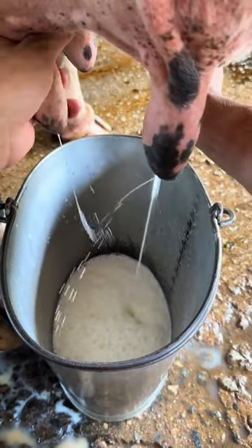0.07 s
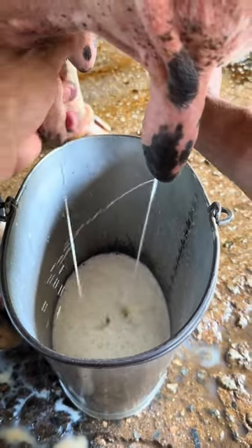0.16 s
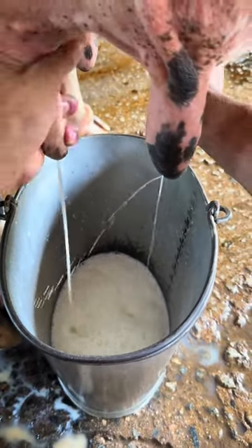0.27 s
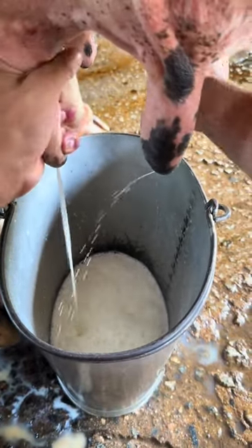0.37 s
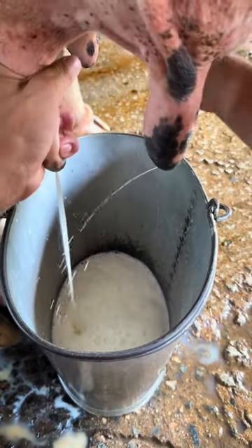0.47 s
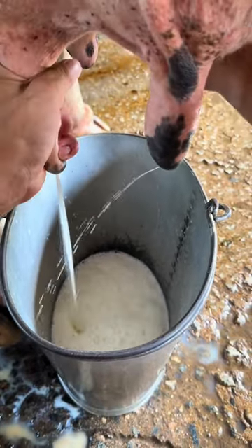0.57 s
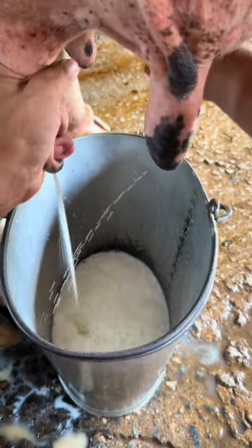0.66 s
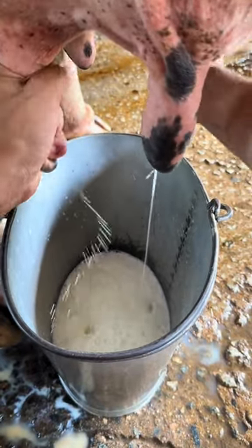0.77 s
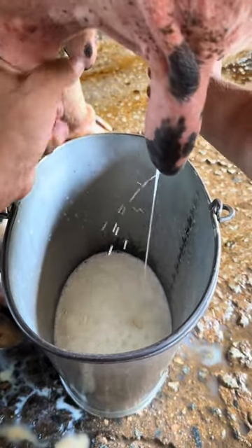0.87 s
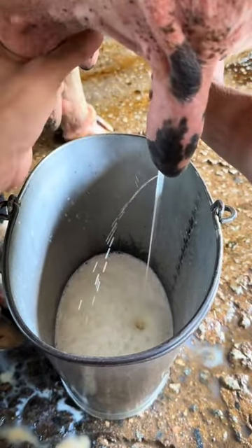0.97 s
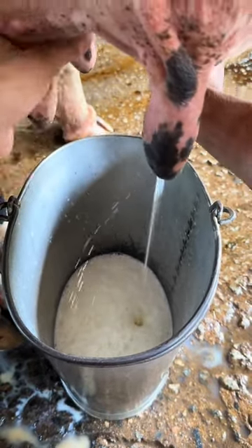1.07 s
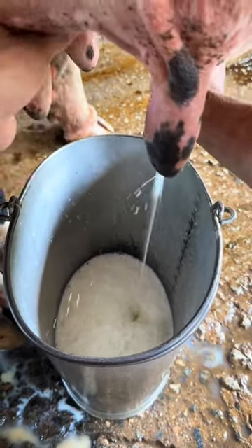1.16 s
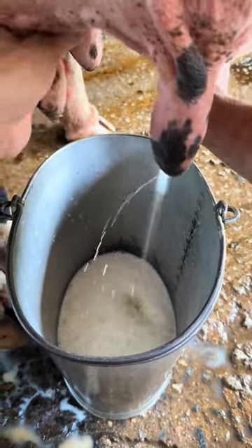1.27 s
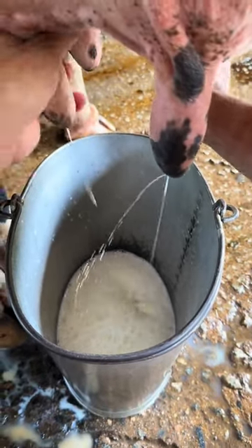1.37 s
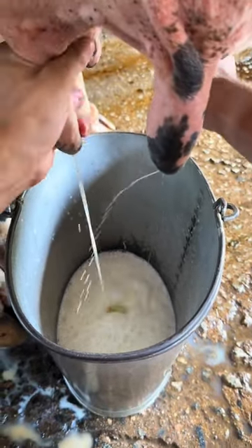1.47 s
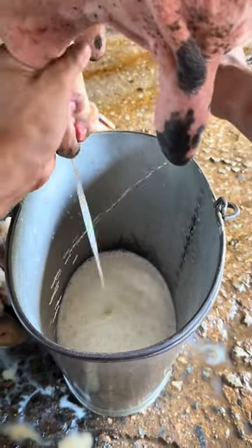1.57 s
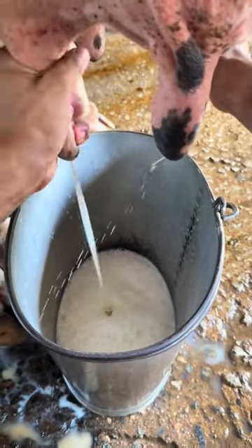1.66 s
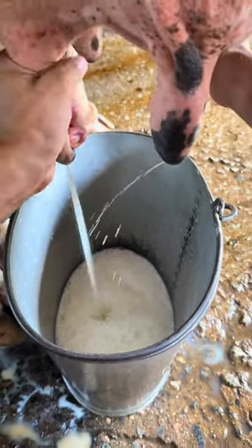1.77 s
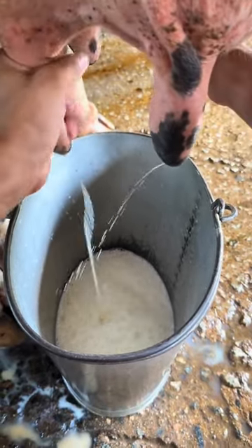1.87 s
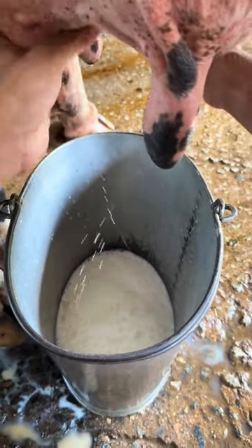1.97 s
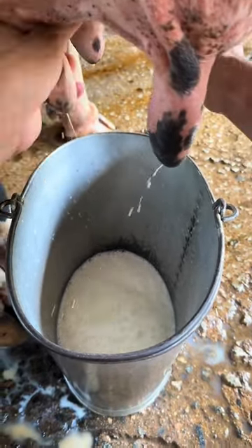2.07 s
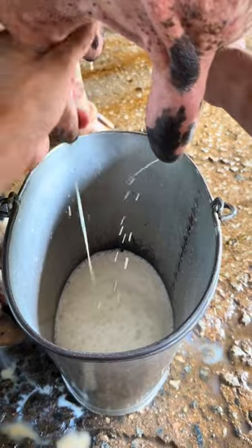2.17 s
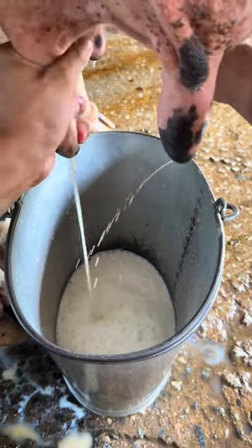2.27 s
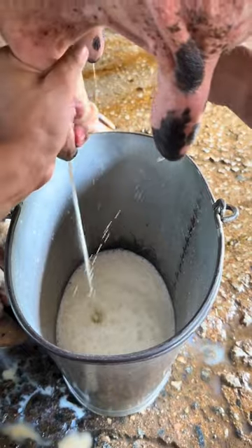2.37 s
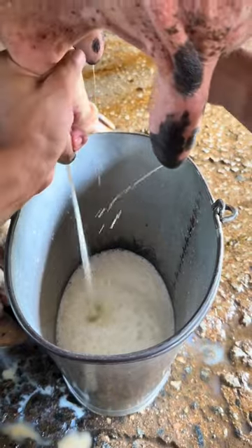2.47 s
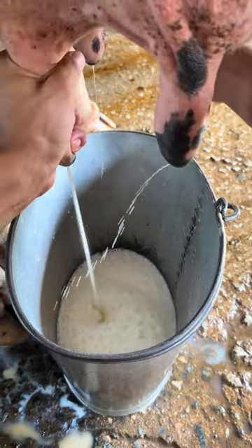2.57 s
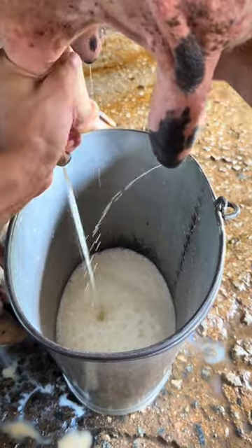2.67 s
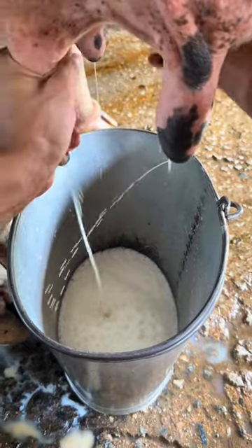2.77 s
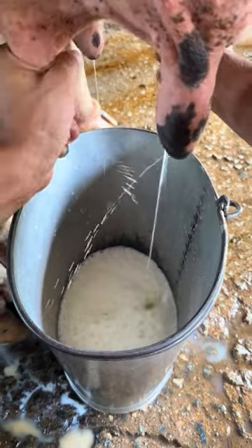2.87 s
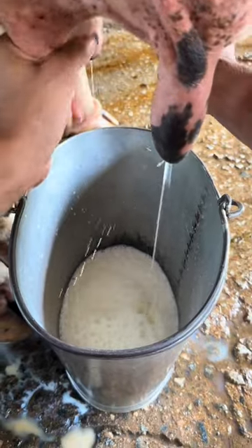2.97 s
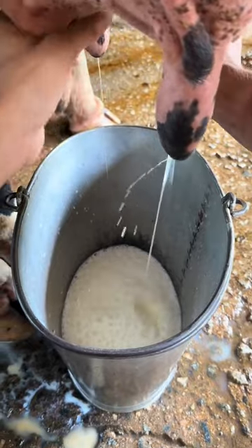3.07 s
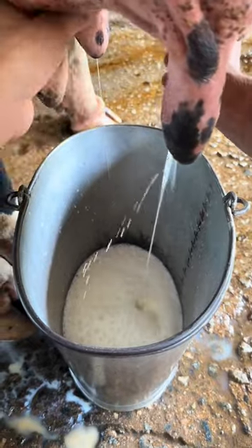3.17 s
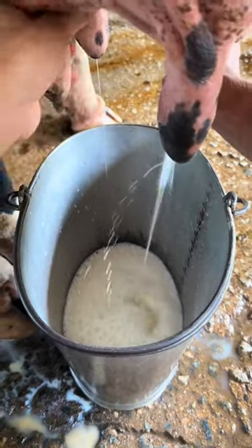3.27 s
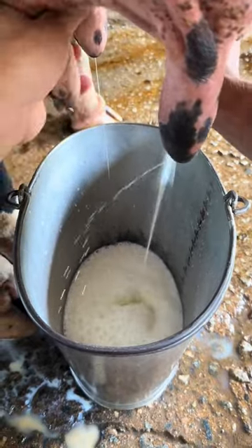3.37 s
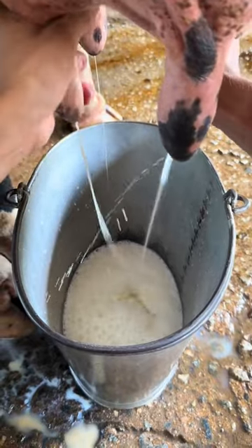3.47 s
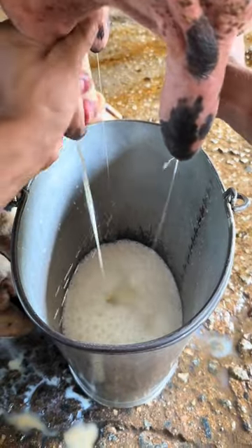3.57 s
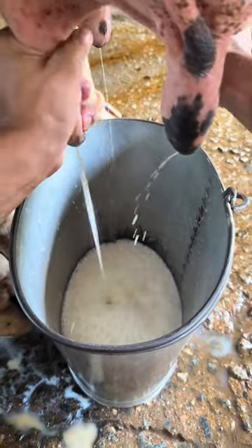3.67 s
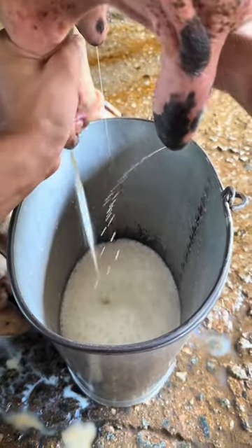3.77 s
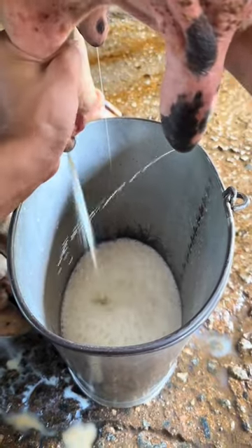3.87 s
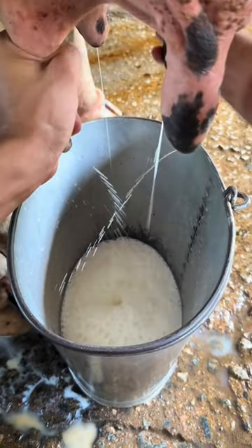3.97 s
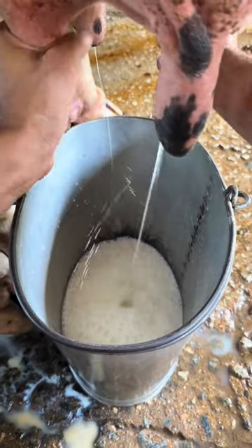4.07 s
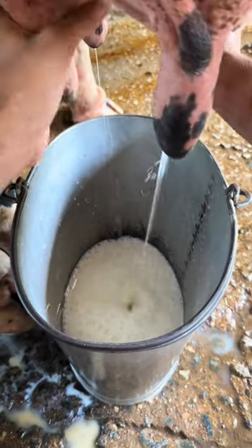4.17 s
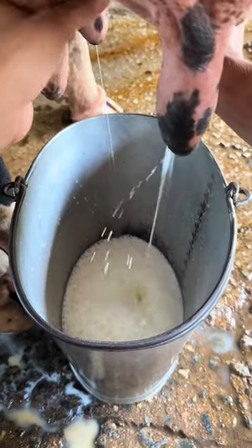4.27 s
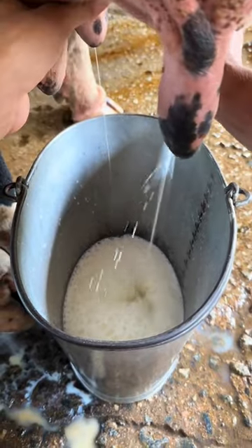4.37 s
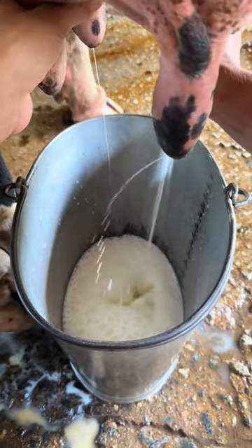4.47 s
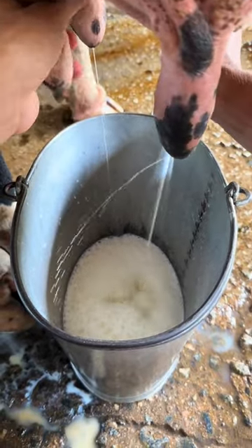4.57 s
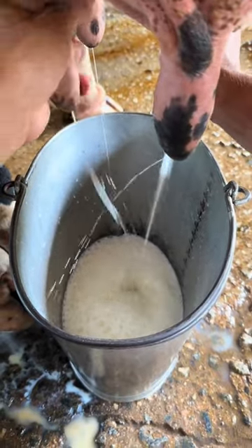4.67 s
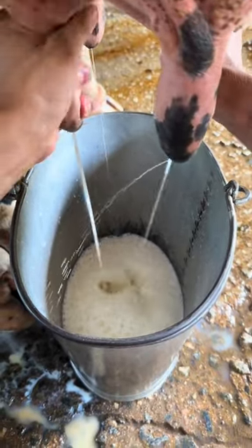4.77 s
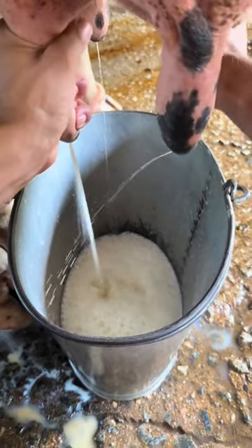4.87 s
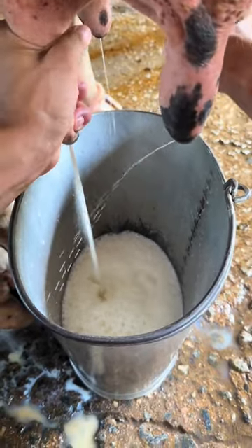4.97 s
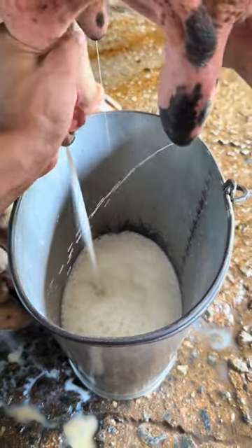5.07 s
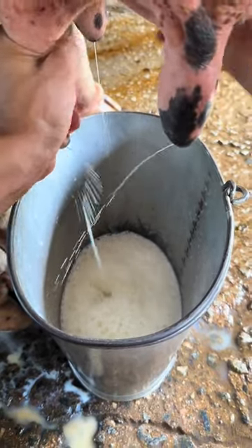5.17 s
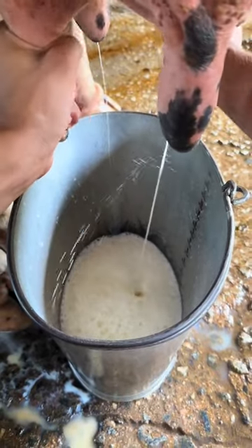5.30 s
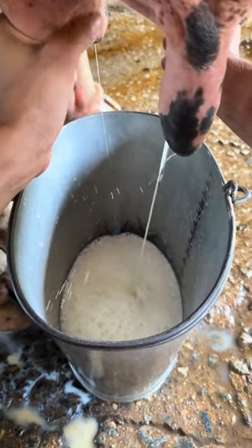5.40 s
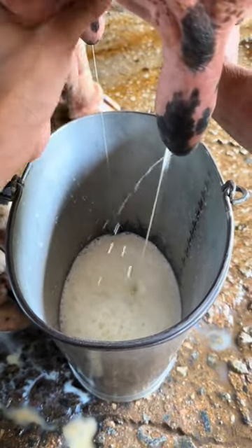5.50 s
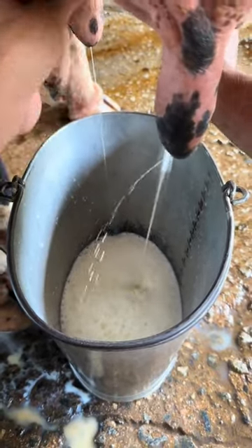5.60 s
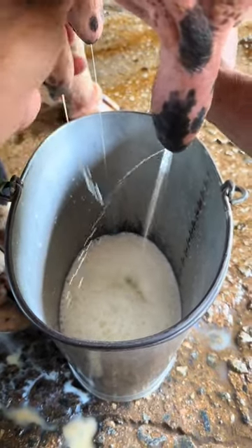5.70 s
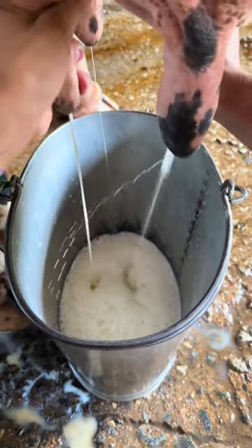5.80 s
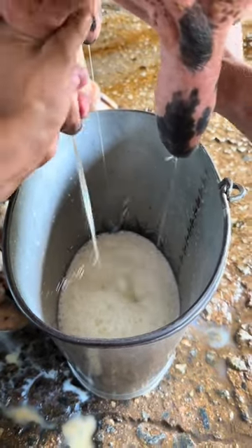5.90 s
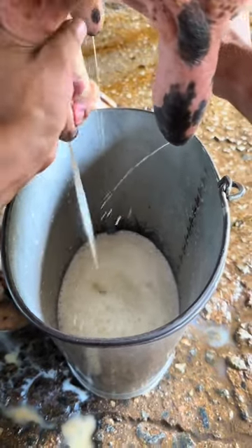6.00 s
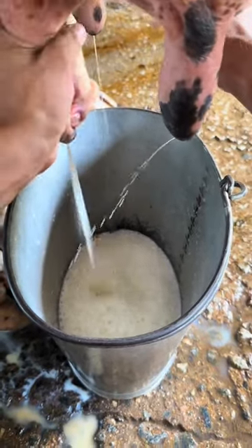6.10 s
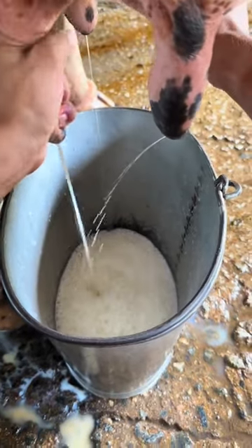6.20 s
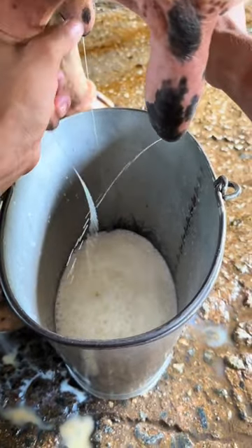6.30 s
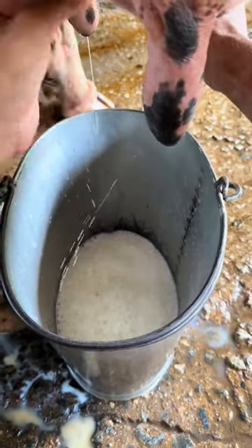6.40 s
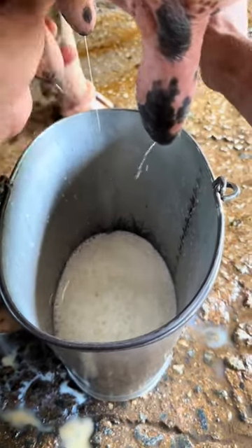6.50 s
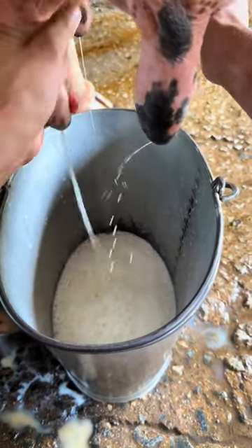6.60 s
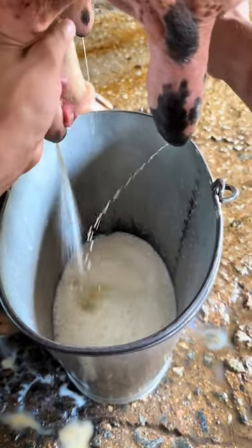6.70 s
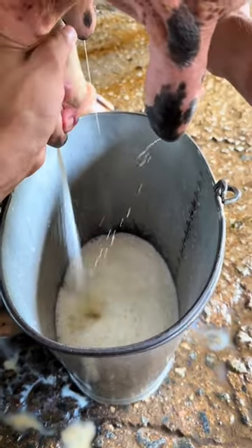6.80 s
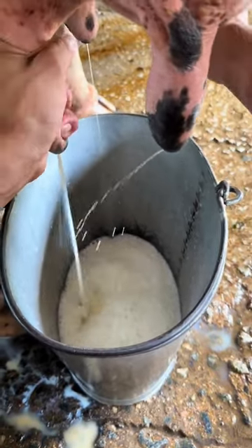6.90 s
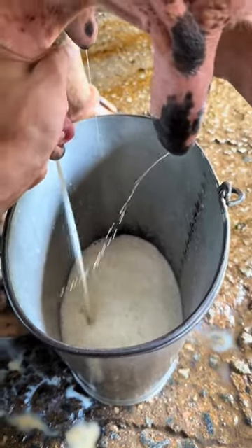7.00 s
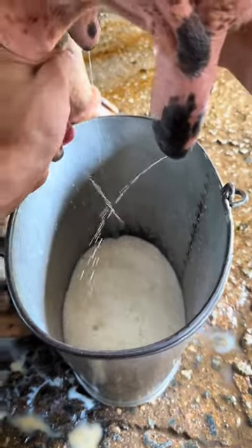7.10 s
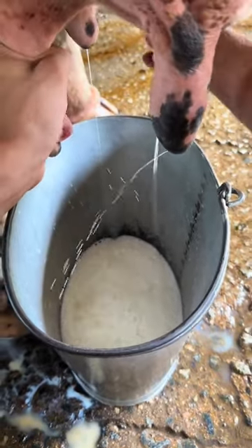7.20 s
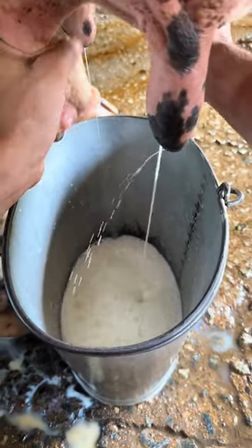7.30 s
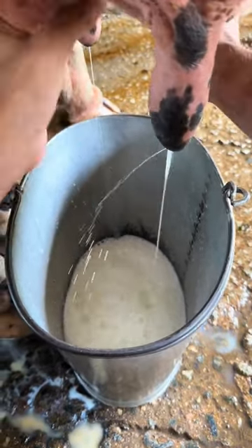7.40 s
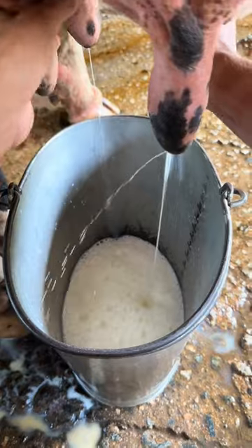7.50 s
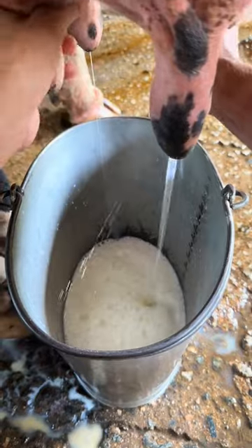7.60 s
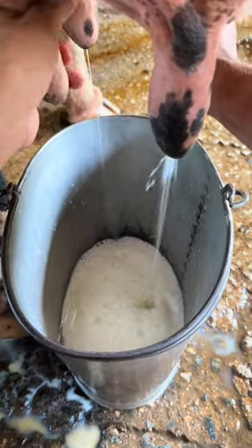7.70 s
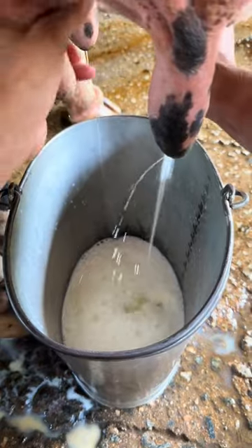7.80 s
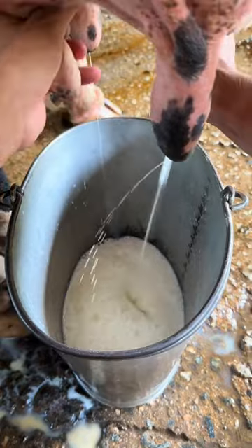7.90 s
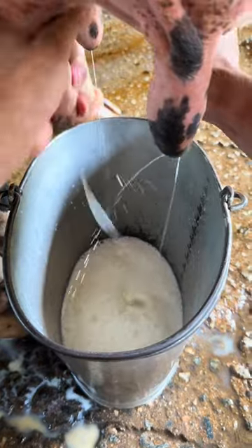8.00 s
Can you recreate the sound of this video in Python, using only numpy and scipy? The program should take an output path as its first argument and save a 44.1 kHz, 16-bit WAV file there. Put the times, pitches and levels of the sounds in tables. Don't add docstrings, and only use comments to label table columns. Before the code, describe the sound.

Rhythmic hand milking into thick froth inside a metal bucket. Crisp hissing spray, dense droplet patter, low thumps around the pail's hollow resonance and rounded bubble plops alternate between two slightly different landing spots. Isolated bright drips and splashes mark the starts and ends. The bursts run almost continuously for eight seconds, with a few brief dips. The close stereo phone sound sways slightly, with thin, patchy, faintly whistling treble and a soft distant shed hum.

```python
import sys
import numpy as np
from scipy import signal
from scipy.fft import rfft, irfft
from scipy.io import wavfile
from scipy.ndimage import uniform_filter1d

SR = 44100
rng = np.random.default_rng(int(sys.argv[2]) if len(sys.argv) > 2 else 0)


def persist_wave(psi):
    counts = np.round(np.clip(psi, -1, 1) * 32767).astype(np.int16)
    wavfile.write(sys.argv[1], SR, np.atleast_2d(counts).T)


def nominal_scale(level):
    x = np.asarray(level, float) / 20
    return 10 ** x


N = 355005
TIME = np.arange(N) / SR
COARSE = np.arange(N // 40 + 2) * 40 / SR

# jet lands in seconds, breaks off in seconds, first force in dB,
# last force in dB, plunge into the froth in dB
LEFT_SQUIRTS = [
    (0.208, 0.741, -43, -41.5, -1),
    (1.469, 1.813, -41, -38.5, 2),
    (2.2, 2.759, -39.5, -42, 2),
    (3.48, 3.95, -40.5, -40, 1.5),
    (4.72, 5.165, -42, -39.5, -1),
    (5.83, 6.211, -40, -41, 2.5),
    (6.632, 7.042, -42.5, -40, -3.5),
    (8.016, 8.2, -44.5, -47, -16),
]
RIGHT_SQUIRTS = [
    (-0.2, 0.194, -36, -42, 0.5),
    (0.84, 1.34, -39, -41.5, -2.5),
    (2.859, 3.484, -40.5, -38.5, -1),
    (4.042, 4.72, -40.5, -39.5, -3),
    (5.284, 5.792, -43, -39.5, 0.7),
    (7.277, 7.895, -44, -39.5, 2.5),
]
BAND_EDGES_HZ = [9475, 10164, 10853, 11542, 13060, 14470, 15850]


def rms_one(x):
    return x / np.sqrt(np.mean(x ** 2) + 1e-20)


def side_gain(db):
    return nominal_scale(np.array([[0], [db]]))


def at_hz(points, hz):
    return np.interp(np.log(hz), np.log(np.array(points)[:, 0]), np.array(points)[:, 1])


def gate(start, end, rise, fall, time=TIME):
    return np.interp(time, [start - rise, start, end, end + fall], [0, 1, 1, 0])


def fine(x):
    return np.interp(TIME, COARSE, x)


def drift(rate):
    r = np.exp(-80 * np.pi * rate / SR)
    chance = rng.standard_normal(len(COARSE) + 2000)
    return rms_one(signal.lfilter([1], [1, -2 * r, r * r], chance)[2000:])


def resonance(x, hz, width_hz):
    r = np.exp(-np.pi * width_hz / SR)
    poles = [1, -2 * r * np.cos(2 * np.pi * hz / SR), r * r]
    return signal.lfilter((1 - r * r) / 2 * np.array([1, 0, -1]), poles, x)


def lifted(x, modes):
    for hz, width_hz, lift_db in modes:
        x = x + (nominal_scale(lift_db) - 1) * resonance(x, hz, np.maximum(width_hz, 20))
    return x


def grains(per_s, spread_db, rows=2):
    draw = rng.random((3, rows, N))
    hit = draw[0] < per_s / SR
    out = np.zeros((rows, N))
    size = nominal_scale(spread_db * np.minimum(-np.log(draw[1][hit] + 1e-9), 5))
    out[hit] = size * np.sign(draw[2][hit] - .5)
    return rms_one(out)


def banded(source, low_hz, high_hz, spectrum, patchy_db):
    # frequency in Hz, side minus mid in dB
    side_width = [(150, -28), (250, -37.5), (380, -17), (600, -3), (900, -2), (1300, -5), (1900, -14.5),
                  (2600, -4.5), (3800, -3), (6000, -3.5), (9000, -5.5)]
    edges = np.geomspace(low_hz, high_hz, 1 + int(np.ceil(3 * np.log2(high_hz / low_hz))))
    out = 0
    for k, (low, high) in enumerate(zip(edges, edges[1:])):
        hz = np.sqrt(low * high)
        band = signal.sosfilt(signal.butter(2, [low, high], "band", fs=SR, output="sos"), source)
        patches = patchy_db * (drift(4.0) + 0.59 * drift(21))
        gain = (-1) ** k * fine(nominal_scale(at_hz(spectrum, hz) + patches))
        out = out + gain * band * side_gain(at_hz(side_width, hz))
    return out


def jets(drum_room, gurgle_room):
    # frequency in Hz, level in dB per Hz
    jet_colour = [(76, -56), (130, -25), (211, -0.5), (291, 1.5), (367, -7.5), (507, -12), (752, -9.5),
                  (884, -16), (984, -15.5), (2990, -21.5), (9400, -28.5), (12200, -68), (20700, -120)]
    # level against force in dB, share of plunge, share of grip time, lasts on in seconds,
    # fall in dB per second
    impacts = [
        (5.5, 0.86, 0.61, 0.066, 366),
        (3, 0.42, 1.11, 0.019, 201),
        (-2.5, -0.16, 1.02, 0.0014, 180),
        (-0.25, -0.28, 1.19, 0.00079, 163),
    ]

    def milk(per_s, spread_db, low_hz, high_hz, patchy_db):
        return in_pail(banded(grains(per_s, spread_db), low_hz, high_hz, jet_colour, patchy_db))

    slugs = bursts(per_s=200, fade_s=0.038)
    drum_gain = drum_room * impact(*impacts[0], late_share=0.046) * nominal_scale(0.1 * slugs)
    drum = drum_gain * milk(1500, 1.6, 119.0, 409.5, patchy_db=0.9)
    gurgle_gain = gurgle_room * impact(*impacts[1]) * nominal_scale(0.11 * slugs)
    gurgle = gurgle_gain * milk(3000, 1.87, 372.6, 1278, patchy_db=0.16)
    splash = impact(*impacts[2]) * nominal_scale(0.25 * slugs) * milk(4000, 1.0, 1076, 2200, patchy_db=0.1)
    spray_gain = impact(*impacts[3]) * nominal_scale(1.63 * slugs)
    spray = spray_gain * milk(9000, 2.0, 1944, 10230, patchy_db=1.45)
    return drum + gurgle + landing(splash + spray), spray_gain


def bursts(per_s, fade_s):
    hits = np.abs(grains(per_s, 0.97, rows=1)[0])
    slugs = signal.lfilter([1], [1, -np.exp(-1 / (fade_s * SR))], hits)
    return rms_one(slugs - slugs.mean())


def impact(rise_db, plunge_share, grip_share, lasts_s, fall, late_share=0):
    ease_s = 0.14
    crisp_per_plunge = 1.2
    dribble_db, dribble_per_plunge, dribble_db_per_s = -9.5, 1.8, 131
    hands = ((0.093, -8.5, LEFT_SQUIRTS), (0.15, -10, RIGHT_SQUIRTS))
    power = 1e-12
    for grip_s, thread_db, squirts in hands:
        for start, end, first_db, last_db, plunge_db in squirts:
            start = start + late_share * grip_s
            full = start + abs(grip_s * grip_share)
            stop = end + lasts_s
            held = np.interp(COARSE, [start - .03, start, full, stop - ease_s, stop],
                             [first_db - 43.5, first_db + thread_db, first_db, last_db, last_db])
            after = np.maximum(COARSE - stop, 0)
            break_off = -fall * nominal_scale(-crisp_per_plunge * min(plunge_db, 0)) * after
            dribble = dribble_db + dribble_per_plunge * plunge_db - dribble_db_per_s * after
            tail = np.maximum(break_off, dribble)
            power = power + nominal_scale(2 * (held + tail + plunge_share * plunge_db))
    return nominal_scale(rise_db) * fine(np.sqrt(power))


def in_pail(x):
    # frequency in Hz, width in Hz, lift in dB
    air_modes = [(217, 14, 4), (249, 112, 5), (302.6, 9.8, 6.5), (510, 17, 8), (657, 25, 3.5),
                 (879, 52, 8.5), (1299, 13, -23)]
    x = lifted(x, air_modes)
    return x / np.sqrt(np.mean(x[0] ** 2))


def landing(x):
    # frequency in Hz, width in Hz, lift in dB
    left_spot = [(1737, 49, 6.5), (3370, 230, 3), (4770, 170, -6), (5550, 1500, 2.5), (7480, 640, 2)]
    right_spot = [(2000, 150, -5), (2400, 130, 3.5), (3630, 510, 2), (6270, 410, 4.5), (6570, 280, -4.5)]
    # peak in Hz, its lift in dB, notch in Hz, its gain in dB
    left_echoes = [(3010, 5.5, 3440, -25), (5930, 4, 5600, -9), (3020, 0.5, 6500, -3), (9100, 8, 1800, 1.5),
                   (3500, 1, 9000, 2), (6200, 2.5, 4100, -3), (2870, -3, 2110, -7.5), (4000, 4, 6500, 15)]
    right_echoes = [(9160, 10.4, 9360, -24), (5570, 1.4, 3300, -4), (5970, 3, 4100, 1),
                    (5770, 1.1, 3100, 0), (3130, 1.6, 3340, -11), (5370, 3.7, 4930, 3.5)]
    out = x.copy()
    hands = ((left_spot, LEFT_SQUIRTS, left_echoes), (right_spot, RIGHT_SQUIRTS, right_echoes))
    for spot, squirts, echoes in hands:
        for (start, end, *_), (peak_hz, lift_db, notch_hz, cut_db) in zip(squirts, echoes):
            part = slice(max(round((start - .05) * SR), 0), round((end + .12) * SR))
            plain = x[:, part]
            own = [(peak_hz, 330, lift_db), (notch_hz, 330, cut_db),
                   (peak_hz - 720, 400, -.8 * max(lift_db + 0.5, 0))]
            coloured = lifted(plain, list(spot) + own)
            change = coloured * plain.std() / coloured.std() - plain
            out[:, part] += gate(start + 0.029, end + 0.062, 0.03, 0.039)[part] * change
    return out


def craters():
    # start in seconds, end in seconds, pitch in Hz, width in Hz, level in dB
    hollows = [(.25, .31, 2950, 400, -46), (.325, .365, 2980, 250, -39.5), (.38, .775, 2950, 330, -45),
               (.836, .857, 1620, 350, -35), (.838, .858, 2450, 400, -40), (1.385, 1.47, 3500, 5000, -53),
               (1.505, 1.55, 1150, 500, -30.5), (1.495, 1.545, 2450, 500, -39.5),
               (2.82, 2.875, 3000, 5000, -51), (2.88, 2.945, 2000, 1500, -42), (3.04, 3.2, 5800, 1200, -46),
               (2.13, 2.142, 2650, 400, -62), (.862, .872, 7500, 3000, -50),
               (2.167, 2.173, 4500, 5000, -53), (2.188, 2.198, 5500, 2000, -53),
               (2.229, 2.265, 1250, 450, -37), (4.076, 4.09, 1400, 450, -36), (4.138, 4.25, 4400, 300, -49),
               (4.778, 4.803, 1500, 1300, -37.5), (4.808, 4.85, 560, 350, -35),
               (4.84, 4.87, 1300, 600, -41), (5.3, 5.355, 5800, 2500, -49), (5.335, 5.345, 1500, 400, -36),
               (5.335, 5.35, 3600, 2500, -44), (5.395, 5.44, 6000, 350, -51),
               (6.444, 6.448, 1500, 1200, -53), (6.528, 6.538, 1000, 600, -47),
               (6.8, 7.075, 2900, 320, -42), (7.212, 7.226, 1100, 700, -49), (7.238, 7.32, 5200, 3500, -53),
               (7.235, 7.29, 1300, 1600, -50), (7.3, 7.36, 650, 600, -41), (7.43, 7.7, 1400, 600, -42.5)]
    patter = grains(2500, 2.7)
    out = np.zeros((2, N))
    for start, end, hz, width_hz, level_db in hollows:
        part = slice(round((start - .05) * SR), round((end + .25) * SR))
        once = resonance(patter[:, part], hz, 1.15 * width_hz)
        ring = rms_one(resonance(once, hz, 1.15 * width_hz))
        swell = gate(start, end, .002 + .12 * min(end - start, .1), .012)[part]
        out[:, part] += nominal_scale(level_db - 1) * swell * ring * side_gain(-12)
    return out


def cave_ins():
    lasts_s, after_s = .036, .046
    out = np.zeros((2, N + SR))
    age = np.arange(round(lasts_s * SR)) / SR
    shape = np.sin(np.pi * (age / lasts_s) ** .8)
    for _, end, _, last_db, plunge_db in LEFT_SQUIRTS:
        at = round((end + after_s) * SR)
        hz = 280 * rng.uniform(.92, 1.08)
        out[0, at:at + len(age)] += nominal_scale(last_db + plunge_db + 8) * shape * np.sin(2 * np.pi * hz * age)
    return out[:, :N]


def knocks(rows, swell_s, level_db):
    swallowed = 0.26
    out, busy = np.zeros((2, N + SR)), np.zeros(N + SR)
    age = np.arange(SR // 10) / SR
    shape = age / swell_s * np.exp(1 - age / swell_s)
    for s, peak_db, hz in rows:
        part = slice(round(s * SR), round(s * SR) + len(age))
        out[0, part] += nominal_scale(peak_db + level_db) * shape * np.sin(2 * np.pi * hz * age)
        busy[part] = np.maximum(busy[part], shape)
    return out[:, :N], 1 - swallowed * busy[:N]


def thumps():
    # start in seconds, peak in dB, pitch in Hz
    slug_hits = [(0.085, -20, 270), (0.363, -24, 267), (0.414, -25.5, 250), (0.67, -26, 280),
                 (0.701, -31, 275), (0.926, -24, 307), (1.099, -23, 310), (1.147, -26, 293),
                 (1.187, -19, 260), (1.35, -29.5, 250), (1.486, -22.5, 272), (1.556, -20.5, 296),
                 (1.669, -20, 289), (1.704, -18.5, 306), (1.788, -22, 280), (1.881, -26, 290),
                 (2.209, -25.5, 262), (2.25, -26, 262), (2.325, -21.5, 278), (2.79, -19.5, 291),
                 (2.564, -22, 276), (2.628, -22.5, 282), (2.727, -20, 257), (2.954, -23, 298),
                 (3.049, -24, 308), (3.103, -29, 260), (3.347, -28, 276), (3.383, -31, 253),
                 (3.466, -20.5, 234), (3.511, -30, 269), (3.59, -21.5, 249), (3.637, -20.5, 278),
                 (3.709, -22, 283), (3.758, -17.5, 290), (3.845, -19, 247), (4.084, -27.5, 313),
                 (4.156, -21.5, 243), (4.185, -25.5, 264), (4.229, -18, 266), (4.393, -23.5, 300),
                 (4.569, -26, 267), (5.088, -25, 241), (5.129, -29, 277), (5.152, -22.5, 280),
                 (5.214, -17.5, 290), (5.525, -22, 230), (5.672, -24, 245), (5.732, -28, 260),
                 (6.298, -32, 280), (5.869, -21, 301), (5.924, -16, 264), (6.166, -23, 247),
                 (6.643, -28.5, 263), (6.786, -27, 272), (6.836, -31, 295), (7.706, -21.5, 300),
                 (7.757, -23, 300), (7.894, -18.5, 301), (7.966, -21, 309)]
    return knocks(slug_hits, swell_s=0.0074, level_db=-4)


def plops():
    # start in seconds, peak in dB, pitch in Hz
    bubbles = [(0.137, -24, 683), (0.556, -22, 468), (0.707, -21, 498), (0.744, -26, 864),
               (0.922, -27, 840), (1.154, -23, 890), (1.222, -26, 560), (1.478, -24.5, 394),
               (1.578, -22, 680), (1.728, -18, 580), (1.799, -23, 522), (2.202, -28, 729),
               (2.226, -24, 870), (2.258, -21, 860), (2.452, -28, 778), (2.587, -23, 874),
               (3.011, -21, 885), (3.276, -26, 664), (3.493, -22.5, 623), (3.573, -21.5, 635),
               (4.079, -26.5, 860), (4.27, -30, 640), (4.324, -27, 431), (4.806, -21.5, 560),
               (4.938, -24, 527), (5.132, -18, 515), (5.341, -22.5, 466), (5.495, -28, 516),
               (5.536, -23, 675), (5.942, -18.5, 480), (6.844, -28, 900), (6.882, -27, 422),
               (6.923, -22, 820), (6.95, -22, 844), (7.265, -25.5, 446), (7.328, -23, 406)]
    return knocks(bubbles, swell_s=0.0042, level_db=-9)


def drops():
    # start in seconds, peak in dB, pitch in Hz, ring time to -60 dB in seconds
    lone_drops = [(0.817, -17, 1610, 0.061), (0.826, -28, 2900, 0.03), (1.4061, -20, 4160, 0.043),
                  (1.668, -8, 1020, 0.032), (2.169, -21, 1160, 0.013), (2.206, -24, 1030, 0.04),
                  (2.2272, -23, 902, 0.047), (4.0502, -23, 1820, 0.037), (4.0788, -8, 1510, 0.055),
                  (5.27, -17, 3970, 0.013), (5.291, -18, 1570, 0.055), (5.3362, -3, 1420, 0.028),
                  (6.5266, -47, 1270, 0.06), (8.0162, -24.5, 2400, 0.02)]
    out = np.zeros((2, N + SR))
    age = np.arange(SR // 10) / SR
    for s, peak_db, hz, t60 in lone_drops:
        part = slice(round(s * SR), round(s * SR) + len(age))
        tick = rng.standard_normal((2, len(age))) * np.exp(-age / 0.002)
        tick = 0.34 * min(hz / 4000, 1) ** 2 * tick
        ring = resonance(rng.standard_normal((2, len(age))), hz, 410)
        ring = ring * 1.36 * nominal_scale(-60 * age / np.clip(t60, .01, .2))
        out[:, part] += nominal_scale(peak_db - 10.5) * (tick + ring) * side_gain(-9)
    return signal.sosfilt(signal.butter(2, [700, 9500], "band", fs=SR, output="sos"), out[:, :N])


def spatters():
    # start in seconds, peak in dB
    clots = [(0.2764, -38), (0.329, -29), (0.35, -21), (0.5596, -34), (0.6, -36), (0.825, -29),
             (0.845, -37), (0.938, -23.5), (1.2175, -21), (1.4062, -32), (1.519, -28), (1.67, -22),
             (2.166, -36), (2.2049, -30), (2.25, -26), (2.3052, -31), (2.5386, -25), (2.898, -33),
             (2.9375, -22), (3.0135, -21), (3.0425, -25), (3.1213, -26), (3.184, -17), (3.23, -21.5),
             (3.422, -29), (4.1375, -31), (4.3081, -21), (4.3286, -21.5), (4.3799, -24), (4.4413, -28),
             (4.655, -22), (4.788, -27), (5.3346, -30), (5.6665, -33), (5.9958, -35), (6.618, -29),
             (6.6983, -30), (6.94, -20), (7.8655, -22)]
    fade_s = 0.0089
    hits = np.zeros(N) + 1e-18
    s, peak_db = np.transpose(clots)
    hits[(s * SR).astype(int)] = nominal_scale(peak_db - 11.5)
    fading = signal.lfilter([1], [1, -np.exp(-1 / (fade_s * SR))], hits)
    bright = signal.butter(1, [1500, 5000], "band", fs=SR, output="sos")
    hiss = signal.sosfilt(bright, rng.standard_normal((2, N)))
    return uniform_filter1d(fading, size=40) * rms_one(hiss) * side_gain(-8)


def spans(rows):
    on = sum((gate(a + .004, b - .004, .006, .006, COARSE) for a, b in rows), 0 * COARSE)
    return np.clip(on, 0, 1)


def smooth(x):
    return fine(uniform_filter1d(uniform_filter1d(x, size=8), size=8))


def top_bands(spray_gain):
    whistle_hz = [9819, 10508, 11197, 12573, 13954, 15332]
    # noise in dB and whistle in dB against the spray,
    # side in quadrature from 0 to 1
    band_levels = [(-12, -18, .15), (-15, -15, .15), (-18.5, -19, .15), (-13, -60, .15),
                   (-13.5, -16.5, 0.55), (-8.5, -11, 0.5)]
    # middle in seconds, half length in
    # seconds, lift in dB
    ticks = [
        (1.225, .008, 2),
        (1.68, .012, 7),
        (2.07, .08, -5),
        (2.205, .035, 3),
        (5.26, .04, 1),
        (6.28, .02, 2),
        (6.51, .08, -9),
        (6.621, .004, 6),
        (7.22, .03, 6),
    ]
    # start in seconds, end in seconds
    tone_1 = [(1.771, 1.942), (2.775, 2.862), (2.929, 2.972), (4.661, 4.867), (4.894, 4.943), (5.68, 5.732),
              (5.75, 5.889), (5.956, 5.999), (6.635, 6.716), (7.285, 7.483), (7.529, 7.982)]
    tone_2 = [(0.075, 0.16), (0.2, 0.238), (0.27, 0.308), (1.225, 1.309), (1.361, 1.434), (1.533, 1.611),
              (2.432, 2.496), (2.572, 2.688), (2.74, 2.853), (2.969, 3.062), (3.17, 3.24), (3.332, 3.379),
              (3.541, 3.75), (3.892, 4.072), (4.104, 4.281), (4.708, 4.78), (4.804, 4.899), (4.917, 5.19),
              (5.686, 5.799), (5.846, 5.883), (6.185, 6.246), (6.31, 6.432), (6.664, 6.719), (6.777, 6.908),
              (6.957, 7.001), (7.07, 7.146), (7.442, 7.48), (7.509, 7.602), (7.726, 7.88), (7.912, 8.011)]
    tone_3 = [(0.348, 0.447), (0.525, 0.572), (0.665, 0.711), (0.737, 0.784), (0.915, 0.965),
              (1.025, 1.085), (4.331, 4.426), (5.082, 5.137), (5.2, 5.492), (5.66, 5.8), (7.306, 7.358),
              (7.506, 7.581)]
    tone_5 = [(0.348, 0.412), (0.49, 0.69), (0.729, 0.787), (0.894, 1.036), (1.222, 1.297), (1.321, 1.367),
              (1.414, 1.463), (1.683, 1.73), (2.781, 2.85), (3.315, 3.381), (3.64, 3.759), (3.863, 4.133),
              (4.659, 4.838), (4.879, 5.03), (5.08, 5.14), (5.207, 5.256), (5.326, 5.358), (5.41, 5.619),
              (5.666, 5.79), (6.185, 6.287), (6.325, 6.43), (6.74, 6.83), (6.856, 6.93), (7.04, 7.12),
              (7.439, 7.477), (7.538, 7.645)]
    tone_6 = [(0.348, 0.639), (0.94, 1.431), (1.573, 2.058), (2.154, 2.197), (3.062, 3.428), (3.445, 3.75),
              (3.825, 4.775), (5.341, 5.671), (5.921, 6.072), (7.869, 8.049)]
    # start in seconds, end in seconds
    noise_2 = [(0.003, 0.073), (0.311, 0.859), (1.036, 1.065), (1.123, 1.222), (1.44, 1.524),
               (1.657, 1.698), (1.733, 1.768), (1.948, 2.096), (2.119, 2.316), (2.923, 2.952),
               (3.381, 3.419), (3.753, 3.823), (4.296, 4.412), (4.429, 4.612), (5.193, 5.683),
               (5.886, 5.953), (5.988, 6.182), (6.266, 6.307), (6.435, 6.467), (6.49, 6.557), (6.58, 6.629),
               (7.149, 7.233)]
    noise_3 = [(0.041, 0.073), (1.443, 1.492), (1.66, 1.701), (2.183, 2.273), (3.19, 3.245), (3.325, 3.38),
               (3.77, 3.82), (4.296, 4.328), (5.216, 5.312), (5.88, 5.96), (6.09, 6.14), (6.261, 6.304),
               (7.198, 7.245)]
    noise_5 = [(0.0, 0.136), (0.16, 0.345), (0.827, 0.891), (1.448, 1.541), (1.64, 1.681), (2.145, 2.47),
               (2.725, 2.765), (2.873, 3.036), (3.18, 3.21), (3.3, 3.355), (3.405, 3.445), (3.564, 3.637),
               (3.776, 3.823), (3.95, 4.0), (4.185, 4.215), (4.325, 4.355), (4.395, 4.45), (4.566, 4.72),
               (5.248, 5.323), (5.889, 5.93), (5.991, 6.133), (6.62, 6.71), (7.204, 7.436), (7.625, 7.655),
               (7.675, 7.7), (7.715, 7.765), (7.855, 7.885)]
    noise_6 = [(0.0, 0.345), (0.641, 0.938), (1.434, 1.57), (2.183, 3.016), (3.039, 3.059), (3.753, 3.823),
               (4.778, 5.338), (5.805, 5.918), (6.075, 6.159), (6.197, 6.867), (6.908, 7.866)]
    all_tones = (tone_1, tone_2, tone_3, [], tone_5, tone_6)
    all_noises = ([(0, 9)], noise_2, noise_3, [], noise_5, noise_6)
    out = 0
    hz = np.fft.rfftfreq(N, 1 / SR)
    spray = np.interp(COARSE, TIME, uniform_filter1d(spray_gain, size=80))
    mid, loose = rfft(rng.standard_normal((2, N)))
    filled = sum(gate(s - half, s + half, .008, .008, COARSE) for s, half, _ in ticks)
    tick_db = sum(lift_db * gate(s - half / 2, s + half / 2, .005, .01, COARSE)
                  for s, half, lift_db in ticks)
    spray = spray * nominal_scale(tick_db)
    bands = zip(BAND_EDGES_HZ, BAND_EDGES_HZ[1:], whistle_hz, band_levels, all_tones, all_noises)
    for low, high, centre_hz, (noise_db, tone_db, turn), tones, noises in bands:
        tone_on = spans(tones)
        noise_on = np.clip(spans(noises) - tone_on + filled, 0, 1)
        inside = (hz > low) & (hz < high)
        noise = irfft(np.array([mid, -1j * turn * mid + 0.21 * loose]) * inside, N)
        phase = 2 * np.pi * centre_hz * TIME
        tone = np.array([np.sin(phase), -turn * np.cos(phase)])
        patches = drift(12) > (.5 if high < 15000 else -.5)
        under = .3 * tone_on * (high > 14000) * patches
        tone_gain = (tone_on + 0.2 * noise_on) * spray * nominal_scale(tone_db + 2.5 + 3 * drift(9))
        noise_gain = smooth((noise_on + under) * spray * nominal_scale(2.5 * drift(14))) * nominal_scale(noise_db)
        out = out + noise_gain / noise[0].std() * noise + smooth(tone_gain) * tone
    return nominal_scale(-4.5) * out


def shed():
    # frequency in Hz, level in dB per Hz
    murmur_colour = [(18, -35), (30, -23.5), (87, -13.5), (187, -16), (491, -18.5), (655, -23), (834, -35),
                     (1250, -31), (2170, -39.5), (9500, -52), (12400, -82), (20900, -120)]
    # time in seconds, level in dB
    fan_load = [(0.0, -67), (0.13, -64.5), (0.87, -60), (0.92, -68), (2.33, -56), (2.42, -87),
                (2.55, -63.5), (3.5, -63), (3.79, -71), (4.01, -61.5), (6.3, -61), (6.34, -71),
                (7.29, -54.5), (8.05, -68)]
    fan_hz, fan_width_hz = 76.1, 1.48
    murmur = rms_one(banded(rng.standard_normal((2, N)), 29.16, 9400, murmur_colour, patchy_db=3.0))
    turns = np.cumsum(fan_hz + fan_width_hz * fine(drift(3.7))) / SR
    hum = np.sqrt(2) * np.sin(2 * np.pi * turns)
    hum_gain = nominal_scale(1.5 + np.interp(TIME, *np.transpose(fan_load)))
    return nominal_scale(-55) * murmur + hum_gain * hum * side_gain(-26)


def thinned(x):
    ridge_db, valley_db = 2.8, -6.0
    hz, _, cells = signal.stft(x, SR, nperseg=1024)
    field = uniform_filter1d(rng.standard_normal(cells.shape), size=3, axis=1)
    field = uniform_filter1d(field, size=14, axis=2)
    field /= field.std()
    cells = cells * nominal_scale(ridge_db * field * (hz > 350)[:, None])
    power = uniform_filter1d(uniform_filter1d(abs(cells) ** 2, size=3, axis=1), size=6, axis=2)
    valley = power < nominal_scale(2 * valley_db) * uniform_filter1d(power, size=41, axis=1)
    cells = cells * np.where(valley & (hz > 1900)[:, None], nominal_scale(-22), 1)
    return signal.istft(cells, SR, nperseg=1024)[1][:, :N]


def scene():
    # time in seconds, side level in dB
    image_spread = [(0.2, -6), (1.0, -4), (2.1, -1.5), (3.1, -5.5), (3.8, -2.5), (5, -3.5), (5.6, -5.5),
                    (6.2, -1), (7.2, -3.5)]
    # time in seconds, left minus right in dB
    phone_sway = [(0, .1), (1.7, .5), (3.2, .1), (5.2, .9), (5.8, .2), (7.2, .3), (8.05, 1.1)]
    thump_sound, drum_room = thumps()
    plop_sound, gurgle_room = plops()
    milk, spray_gain = jets(drum_room, gurgle_room)
    low = thinned(milk + shed()) + craters() + drops() + cave_ins()
    low = low + thump_sound + plop_sound + spatters()
    low = irfft(rfft(low) * (np.fft.rfftfreq(N, 1 / SR) < BAND_EDGES_HZ[0]), N)
    low[1] *= nominal_scale(np.interp(TIME, *np.transpose(image_spread)))
    mid, side = low + top_bands(spray_gain)
    lean = nominal_scale(np.interp(TIME, *np.transpose(phone_sway)) / 2)
    return np.array([mid * lean + side, mid / lean - side])


def top_cut(x):
    return signal.sosfilt(signal.butter(12, 15870, fs=SR, output="sos"), x)


def record(dry):
    mix = signal.sosfilt(signal.butter(2, 45, "high", fs=SR, output="sos"), dry)
    return top_cut(mix)


dry = scene()
out = record(dry)
persist_wave(out)
```